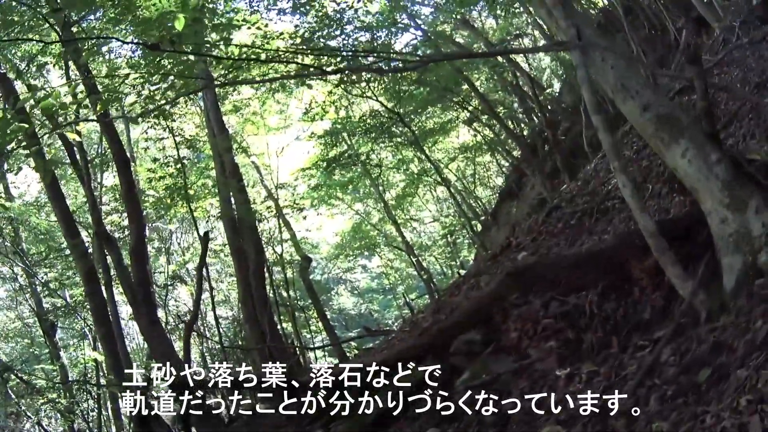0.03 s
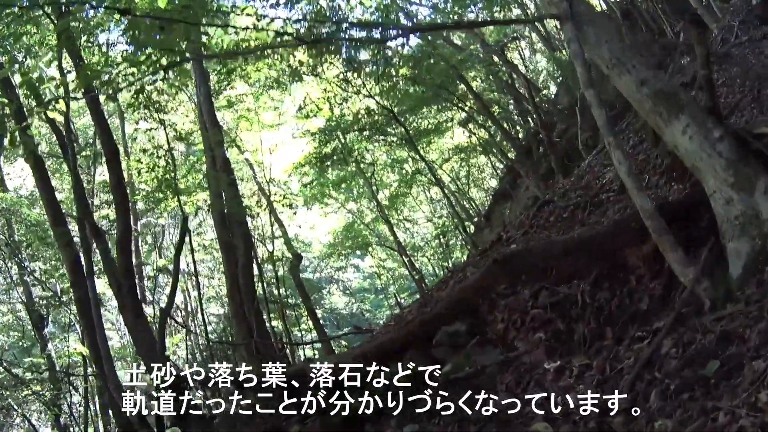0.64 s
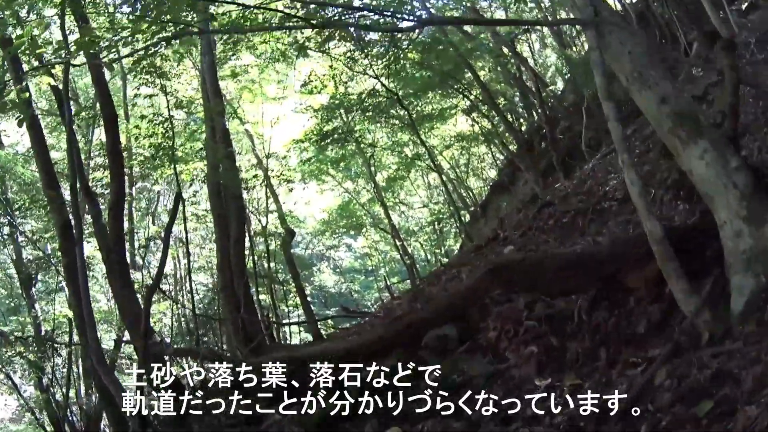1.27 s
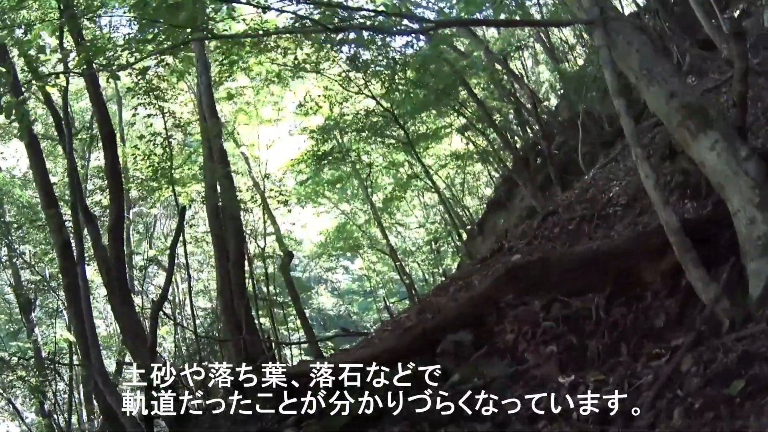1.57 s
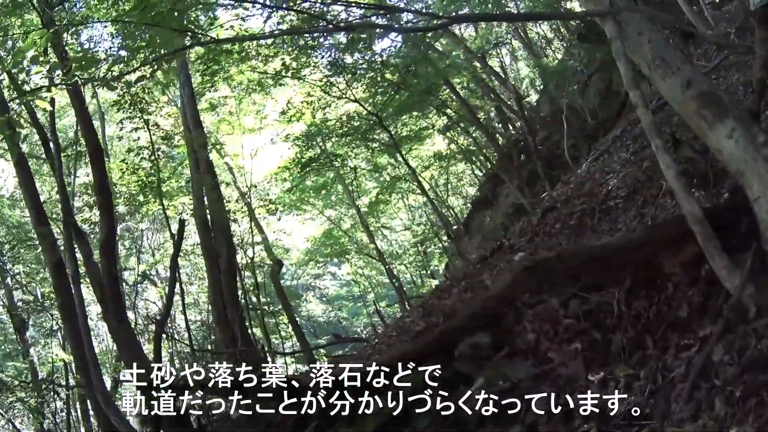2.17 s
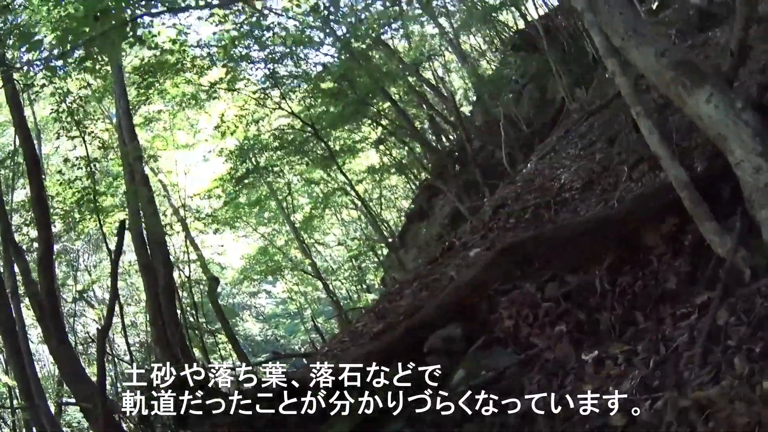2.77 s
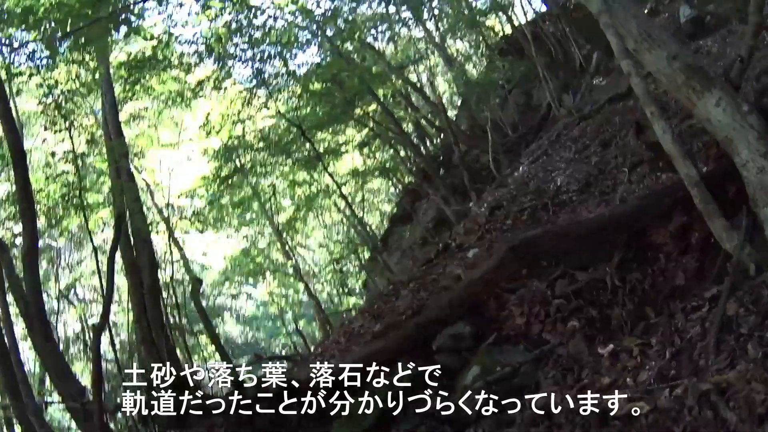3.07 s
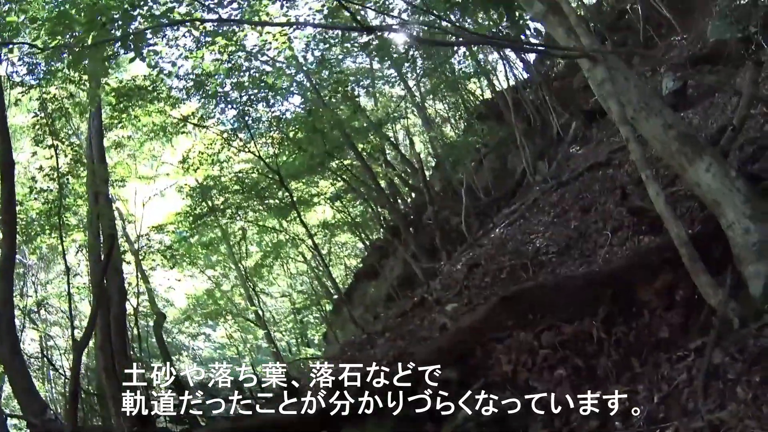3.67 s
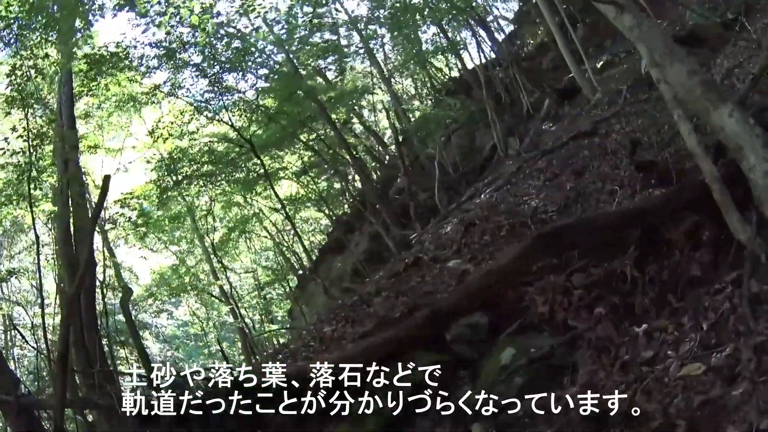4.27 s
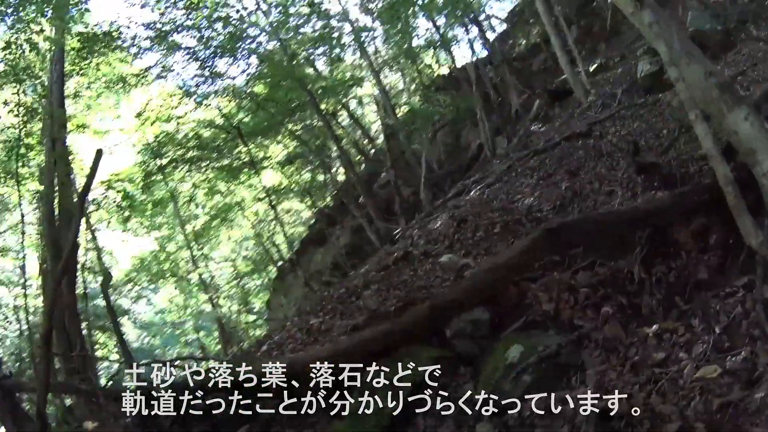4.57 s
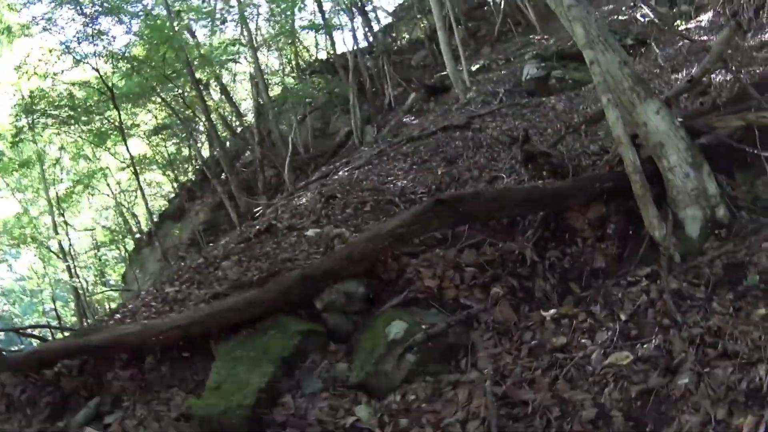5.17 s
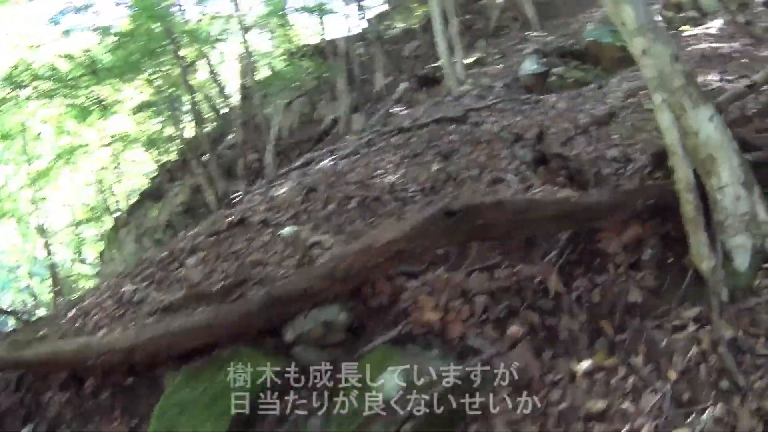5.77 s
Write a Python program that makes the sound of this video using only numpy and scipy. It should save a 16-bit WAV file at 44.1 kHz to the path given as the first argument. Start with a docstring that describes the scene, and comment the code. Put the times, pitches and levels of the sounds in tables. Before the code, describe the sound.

A stream hisses steadily while someone walks slowly over dry leaf litter, twigs cracking and sticks knocking underfoot.

```python
"""Slow steps through dry leaves on a wooded slope, heard by a small hand-held stereo microphone.
A stream hisses below from the start. Near 1 s the first foot lands: leaves crackle, soil thuds softly.
From 2 s the walker moves along the path, so the hiss changes tone; just before 3 s a twig snaps loudly.
Around 4 s sticks knock on the ground. Then the stream fades a little and edges to the left,
under a few last light steps."""
import sys
import numpy as np
from scipy import signal
from scipy.fft import rfft, irfft, next_fast_len
from scipy.io import wavfile

SR = 44100
rng = np.random.default_rng(int(sys.argv[2]) if len(sys.argv) > 2 else 0)


def waveform_to_disk(signal):
    """Save audio, clipped to [-1, 1], as 16-bit WAV at the path in sys.argv[1]."""
    frames = np.transpose(np.atleast_2d(signal))
    scaled = np.clip(frames, -1, 1) * 32767
    samples = np.round(scaled).astype(np.int16)
    wavfile.write(sys.argv[1], SR, samples)


N = 265173
TIME = np.arange(N) / SR
FFT_SIZE = next_fast_len(N + SR // 4)
FREQ = np.arange(FFT_SIZE // 2 + 1) * SR / FFT_SIZE
SIDES = np.array([[1], [-1]])   # left, right
USUAL_PRESS_DB = -58   # leaf level under an ordinary step


def from_db(db):
    """Turn decibels into a volume multiplier."""
    return 10 ** (np.asarray(db) / 20)


def over_time(rows):
    """Join a table's points into curves over time, one per column."""
    times, *columns = np.transpose(rows)
    return [np.interp(TIME, times, column) for column in columns]


def over_frequency(rows):
    """Join a table's points into curves over frequency, one per column."""
    hz, *columns = np.transpose(rows)
    return [np.interp(np.log(FREQ + 1), np.log(hz), column) for column in columns]


def filtered(sound, response):
    """Give each frequency of a sound its own gain and delay."""
    return irfft(rfft(sound, FFT_SIZE) * response, FFT_SIZE)[..., :N]


def tone_filter(gains_db):
    """A filter with these gains that lets nothing sound early (minimum phase)."""
    cepstrum = irfft(np.log(from_db(gains_db)), FFT_SIZE)
    cepstrum[1:FFT_SIZE // 2] *= 2
    cepstrum[FFT_SIZE // 2 + 1:] = 0
    return np.exp(rfft(cepstrum))


def wobble(rate_hz):
    """A smooth random curve that typically strays by 1."""
    slow = filtered(rng.standard_normal(N), np.exp(-(FREQ / rate_hz) ** 2))
    return slow / slow.std()


def ring(start_s, pitch_hz, decay_s):
    """A pure tone that dies away; decay_s is always the time to fall by 60 dB."""
    out, start = np.zeros(N), int(start_s * SR)
    age = TIME[:min(SR // 4, N - start)]
    out[start:start + len(age)] = np.sin(2 * np.pi * pitch_hz * age) * from_db(-60 * age / decay_s)
    return out


def burst(noise, start_s, decay_s):
    """Noise that starts suddenly and dies away."""
    out, start = np.zeros(N), int(start_s * SR)
    age = TIME[:min(SR // 4, N - start)]
    out[start:start + len(age)] = noise[start:start + len(age)] * from_db(-60 * age / decay_s)
    return out


# How the microphone's two sides hear the stream (likeness 1 means the same noise in both):
# frequency_hz, likeness_0_to_1, right_lead_radians, left_minus_right_db
STREAM_STEREO = [(40, 0.98, .05, 1), (200, .94, 0.7, 0), (430, 0.96, 1.22, -0.5), (860, 0.94, 1.53, 0),
                 (1310, 0.99, 1.35, -1.2), (1940, 1, 1.57, -0.8), (2600, 0.93, 1.14, 1),
                 (3960, .96, 0.92, 0.5), (4820, 0.92, 0.42, -0.5), (6600, 0.6, 0.64, 4),
                 (8500, 0.67, 0.5, 3), (11000, 0.6, .25, 1)]


def water_spectrum():
    """Countless far splashes merge into noise that reaches each side a little differently."""
    likeness, lead, balance_db = over_frequency(STREAM_STEREO)
    shared, apart = rfft(rng.standard_normal((2, FFT_SIZE)))
    water = np.sqrt((1 + likeness) / 2) * shared + SIDES * np.sqrt((1 - likeness) / 2) * apart
    return water * np.exp(-SIDES * 0.5j * lead) * from_db(SIDES * balance_db / 2)


# The stream's tone at three places on the path: frequency_hz, place_0_db, place_1_db, place_2_db
STREAM_TONES = [(25, -16.5, -28, -33), (62, -18.5, -16, -9.5), (154, -16.5, -15.5, -16.5),
                (271, -11.5, -11, -8.5), (740, -6.5, -8.5, -7), (1078, -4.5, -1.76, 0),
                (1860, -5.5, -8, -8.5), (2870, -4, -3, -1.5), (4710, -12, -13.5, -14.5),
                (6140, -22.5, -23, -22), (9570, -43.5, -43, -46), (11000, -43.5, -44.5, -43.5)]
# How the stream swells and fades: time_s, relative_level_db
STREAM_LEVELS = [(0.0, -45), (2.22, -44.5), (2.54, -43), (4.13, -43.5), (6.0, -46)]


def stream(gain_db, flutter_db, set_off_s, places_per_s, turn_s, turn_db_per_s):
    """The water's hiss changes tone as the walker passes along the path, and later edges left."""
    place = np.minimum(0.16 + places_per_s * np.maximum(TIME - set_off_s, 0), 2)
    water, hiss = water_spectrum(), 0
    for k, tone_db in enumerate(over_frequency(STREAM_TONES)):
        nearness = np.clip(1 - abs(place - k), 0, 1)
        hiss = hiss + nearness * irfft(water * from_db(tone_db), FFT_SIZE)[:, :N]
    level_db = over_time(STREAM_LEVELS)[0] + gain_db + flutter_db * wobble(28)
    leftward_db = turn_db_per_s * np.maximum(TIME - turn_s, 0)
    return hiss * from_db(level_db + SIDES * leftward_db / 2)


def slope_echo(sound, level_db, decay_s, delay_s):
    """The bank and the tree trunks scatter back a short echo, different on each side."""
    age = TIME[:SR // 4]
    tail = rng.standard_normal((2, len(age))) * from_db(-60 * age / decay_s) * (age > delay_s)
    tail /= np.sqrt(np.sum(tail ** 2, axis=1, keepdims=True))
    return from_db(level_db) * filtered(sound, rfft(tail, FFT_SIZE))


# Weight landing on soft soil: start_s, strength_db, pitch_hz, decay_s
SOIL_THUDS = [(0.893, -54, 142, 0.041), (1.203, -58, 170, 0.059), (1.238, -58, 140, 0.05),
              (1.328, -56, 85, 0.11), (2.963, -56, 116, 0.051), (3.171, -45, 340, 0.017),
              (3.957, -51, 240, 0.035), (4.033, -43.5, 340, 0.012)]


def soil(crumble_db, crumble_band_hz, crumble_stretch):
    """Soil answers a foot with a dull, short swing and crumbles for a little longer."""
    band = signal.butter(2, crumble_band_hz, "band", fs=SR, output="sos")
    crumble = signal.sosfilt(band, rng.standard_normal(N))
    crumble = from_db(crumble_db) * crumble / crumble.std()
    return sum(from_db(db) * (ring(start_s, hz, decay_s)
                              + burst(crumble, start_s, crumble_stretch * decay_s))
               for start_s, db, hz, decay_s in SOIL_THUDS)


# Sticks knocked against the ground: start_s, strength_db
STICK_KNOCKS = [(.921, -40), (1.3484, -40.5), (2.857, -30), (3.171, -37.5), (3.928, -41), (3.959, -35.5),
                (3.967, -36.5), (3.9829, -33), (3.9881, -39)]
# The tones a stick rings with: pitch_hz, relative_level_db, decay_s
STICK_TONES = [(450, -18, 0.0034), (700, -13, 0.0025), (1015, -5, 0.0086), (1320, -2, 0.0067)]


def sticks(bass_cut_hz):
    """A knocked stick rings with all its tones at once; its knocks carry no deep bass."""
    knocks = sum(from_db(db + tone_db) * ring(start_s, hz, decay_s)
                 for start_s, db in STICK_KNOCKS for hz, tone_db, decay_s in STICK_TONES)
    return signal.sosfilt(signal.butter(2, bass_cut_hz, "high", fs=SR, output="sos"), knocks + 1e-18)


def stalk_snaps(press_db, usual_per_s, above_leaves_db, spread_db, pitch_hz, width_hz):
    """List random snaps of leaf stalks: a harder press breaks more of them, and louder."""
    breaks = rng.random(N) < usual_per_s * from_db(press_db - USUAL_PRESS_DB) / SR
    db = press_db + above_leaves_db + spread_db * rng.uniform(-0.68, 1, N)
    hz = pitch_hz * 2 ** (0.93 * rng.uniform(-0.22, 1, N))
    return [(*row, width_hz) for row in zip(TIME[breaks], db[breaks], hz[breaks])]


# Twigs breaking underfoot: start_s, strength_db, pitch_hz, band_width_hz
TWIG_SNAPS = [(1.2775, -30, 4530, 1200), (1.3292, -28, 4400, 1500), (1.3348, -30, 3300, 1200),
              (1.3402, -28, 3000, 1500), (1.3485, -28, 8500, 4000), (1.3489, -25, 3000, 3500),
              (1.4876, -27, 4100, 600), (1.4908, -27, 4400, 600), (1.5094, -27, 4200, 900),
              (2.1742, -26, 9800, 8000), (2.1785, -25, 6430, 5000), (2.2134, -28.5, 2600, 3500),
              (2.2944, -35, 6200, 4000), (2.3985, -36, 7000, 6000), (2.428, -32, 5700, 5000),
              (2.451, -26.5, 3830, 4000), (2.4555, -32, 5200, 3000), (2.496, -32, 7000, 4000),
              (2.8567, -22, 5430, 900), (2.8567, -17.5, 10500, 5000), (2.8577, -17, 3540, 2200),
              (2.8596, -25, 2630, 1500), (3.0424, -39, 3270, 3000), (3.0545, -28.5, 5900, 2500),
              (3.0755, -31, 4140, 3000), (3.078, -31, 3300, 4000), (3.109, -32, 8400, 4000),
              (3.5698, -38, 6400, 4000), (3.5973, -38, 6200, 4000), (3.6472, -29, 4700, 1500),
              (3.6766, -37, 4900, 4000), (3.7583, -30.5, 7500, 3000), (3.9282, -26.5, 3600, 2500),
              (3.9586, -24, 5500, 3500), (4.0965, -22, 1750, 1200), (4.5765, -32, 4300, 4000),
              (4.606, -30, 3500, 3000), (5.2846, -27.5, 4700, 1500), (5.291, -34, 4500, 1500)]


def twigs_and_stalks(stalks, crack_db, tear_db, tear_decay_s, ring_db, ring_cycles):
    """Each snap is a sharp crack, tearing fibres and a ringing piece; lower pieces ring longer."""
    fibres, out = rng.standard_normal(N), 0
    for start_s, db, hz, width_hz in TWIG_SNAPS + stalks:
        crack = from_db(tear_db) * burst(fibres, start_s, tear_decay_s)
        crack[int(start_s * SR)] += from_db(crack_db)
        crack = signal.lfilter(*signal.iirpeak(hz, hz / width_hz, fs=SR), crack + 1e-18)
        piece = from_db(ring_db) * ring(start_s, hz, ring_cycles / hz)
        out = out + from_db(db) * (crack + piece)
    return out


# A foot on the leaves; a slide is bright, a full tread darker:
# full_weight_s, strength_db, swell_s, hold_s, fade_s, brightness_db_per_octave
FOOT_PRESSES = [(.87, -57.5, 0.13, 0.026, 0.049, -4), (1.26, -54.5, 0.074, 0.076, 0.064, -1),
                (1.331, -54.5, .006, 0.014, 0.028, -2.5), (1.46, -56.5, 0.063, 0.05, 0.13, 3),
                (2.2, -56.5, 0.045, 0.0061, 0.073, -4), (2.362, -51.5, 0.012, .015, 0.027, 2),
                (2.456, -49.5, 0.022, 0.074, 0.016, 1), (2.689, -58.5, 0.09, 0.011, 0.29, 2),
                (3.008, -54, .004, .006, 0.0087, 1), (3.05, -49.5, 0.02, 0.028, 0.055, 1.3),
                (3.56, -58.5, 0.074, 0.032, 0.029, 5), (3.64, -55.5, 0.016, 0.034, 0.089, 3.5),
                (3.893, -52.5, 0.055, 0.028, 0.15, -3), (4.519, -58, 0.015, 0.11, .045, -2.5),
                (5.282, -56.5, .012, 0.017, 0.04, -2)]


def foot_pressure(rustle_db):
    """Leaf level and brightness over time: presses swell, hold and fade over a faint, steady rustle."""
    power, brightness = from_db(rustle_db) ** 2, 0
    for full_s, db, swell_s, hold_s, fade_s, db_per_octave in FOOT_PRESSES:
        before = np.maximum(full_s - TIME, 0) / swell_s
        after = np.maximum(TIME - full_s - hold_s, 0) / fade_s
        press_power = (from_db(db) * np.exp(-before - after)) ** 2
        power = power + press_power
        brightness = brightness + db_per_octave * press_power
    return 10 * np.log10(power), brightness / power


def leaves(press_db, brightness, usual_cracks_per_s, spread_db, clump_db, rubbing, ring_q):
    """Dry leaves break in clumps of tiny, briefly ringing cracks, over a smooth rubbing noise."""
    busy = from_db(0.8 * (press_db - USUAL_PRESS_DB))   # a harder press breaks more leaves at once
    sizes = from_db(spread_db * np.minimum(rng.exponential(1, N), 4)) * rng.choice([-1, 1], N)
    cracks = sizes * (rng.random(N) < busy * usual_cracks_per_s / SR) / np.sqrt(busy)
    pitches_hz = np.geomspace(1800, 9500, 12)
    which_pitch = rng.integers(0, len(pitches_hz), N)
    left_share = 0.5 + 0.4 * rng.uniform(-1, 1, N)   # leaves lie to both sides
    cracks = cracks * np.array([left_share, 1 - left_share])
    crackle = np.zeros((2, N))
    for k, hz in enumerate(pitches_hz):
        gain = from_db(brightness * np.log2(hz / np.median(pitches_hz))) / np.sqrt(hz)
        leaf_ring = signal.iirpeak(hz, ring_q, fs=SR)   # a higher q rings longer
        crackle += gain * signal.lfilter(*leaf_ring, cracks * (which_pitch == k) + 1e-18)
    crunch = crackle / crackle.std() + rubbing * rng.standard_normal(N)
    return crunch * from_db(press_db + clump_db * wobble(41))


# The tone shared by breaking leaves and twigs: frequency_hz, gain_db
BRITTLE_TONE = [(40, -22), (200, -8), (500, 5), (1200, -1.5), (2200, -1.5), (3200, 5), (5000, 0),
                (6300, -4.5), (8000, -13.5), (9600, -20.5), (11000, -18.5)]


def scene():
    """The stream all around, the leaves close by, and snaps, knocks and thuds with a faint echo."""
    water = stream(gain_db=6, flutter_db=0.48, set_off_s=1.98, places_per_s=0.54,
                   turn_s=4, turn_db_per_s=0.45)
    press_db, brightness = foot_pressure(rustle_db=-67.5)
    crunch = from_db(-3) * leaves(press_db, brightness, usual_cracks_per_s=1400, spread_db=3,
                                  clump_db=0.8, rubbing=0.33, ring_q=1.7)
    stalks = stalk_snaps(press_db, usual_per_s=11, above_leaves_db=18, spread_db=3.5,
                         pitch_hz=4530, width_hz=4900)
    snaps = twigs_and_stalks(stalks, crack_db=-0.5, tear_db=-9.5, tear_decay_s=0.0089,
                             ring_db=-18, ring_cycles=9.5)
    thuds = soil(crumble_db=-3, crumble_band_hz=[70, 706], crumble_stretch=1.56)
    cushion = signal.butter(2, 1800, fs=SR, output="sos")   # fallen leaves muffle sticks and soil
    ground = signal.sosfilt(cushion, sticks(bass_cut_hz=380) + thuds + 1e-18)
    brittle = tone_filter(over_frequency(BRITTLE_TONE)[0])
    blows = filtered(snaps, brittle) + ground
    echo = slope_echo(blows, level_db=-6.5, decay_s=0.068, delay_s=0.0028)
    return water + filtered(crunch, brittle) + blows + echo


# Pitches that the microphone's case boosts or weakens: pitch_hz, width_hz, gain_db
MICROPHONE_CASE = [(716, 61, 2), (827, 96, -3.5), (1345, 208, 10), (1523, 120, -3), (2310, 480, 8.5),
                   (4327, 1023, 9), (8140, 1585, 16)]


def record(dry):
    """The microphone's case colours everything, and the highest treble is cut off."""
    for hz, width_hz, db in MICROPHONE_CASE:
        band = signal.lfilter(*signal.iirpeak(hz, hz / width_hz, fs=SR), dry)
        dry = dry + (from_db(db) - 1) * band
    treble_cut = signal.ellip(12, 0.1, 80, 11150, fs=SR, output="sos")   # steep, above 11150 Hz
    return signal.sosfilt(treble_cut, dry)


dry = scene()
out = record(dry)
waveform_to_disk(out)
```